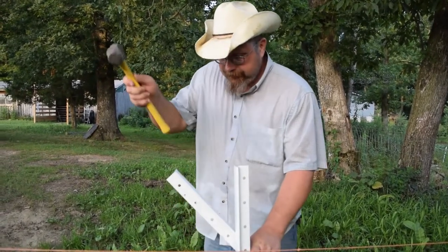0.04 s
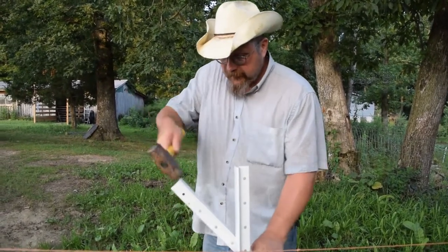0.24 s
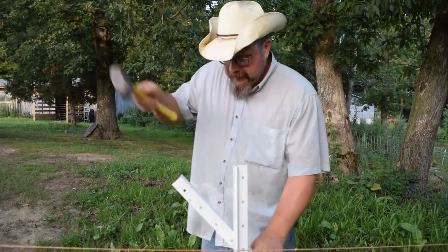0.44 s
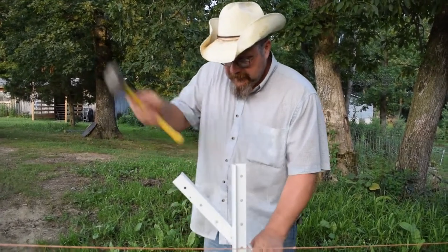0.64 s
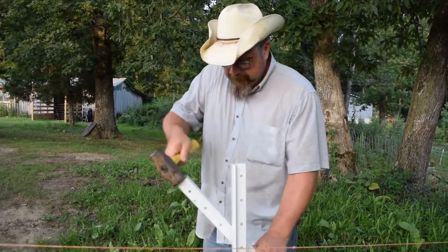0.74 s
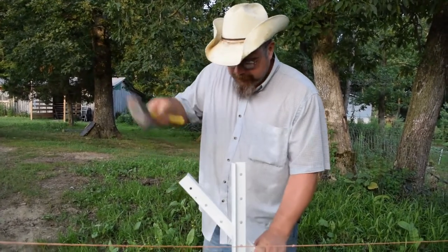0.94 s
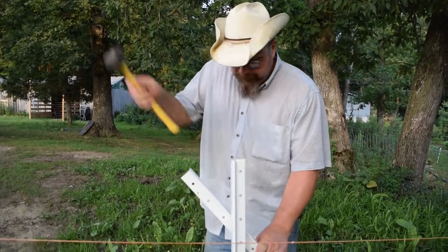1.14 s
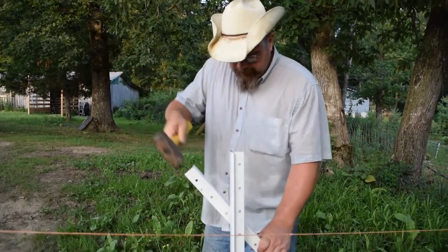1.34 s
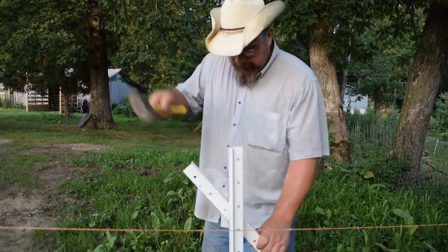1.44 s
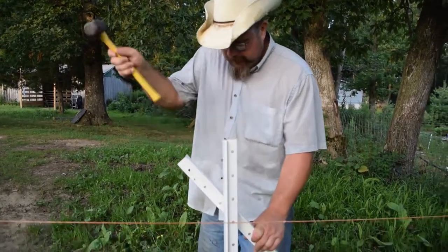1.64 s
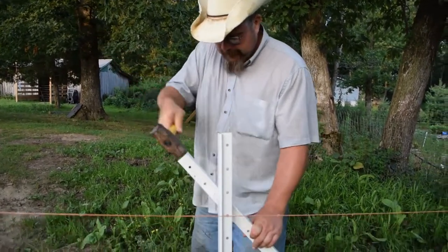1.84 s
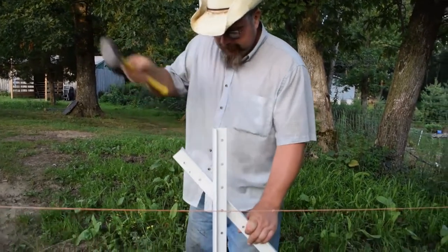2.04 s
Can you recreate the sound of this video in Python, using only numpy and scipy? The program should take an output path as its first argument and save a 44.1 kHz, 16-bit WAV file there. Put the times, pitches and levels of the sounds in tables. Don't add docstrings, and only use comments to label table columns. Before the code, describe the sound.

A heavy hammer whacks a hollow plastic brace against a post four times, each blow a sharp clattering crack with a dull thump and short outdoor echo; close microphone slightly overloaded, faint engines and insects behind.

```python
import sys
import numpy as np
from scipy import signal
from scipy.io import wavfile
from scipy.ndimage import uniform_filter1d

SR = 44100
rng = np.random.default_rng(int(sys.argv[2]) if len(sys.argv) > 2 else 0)


def inscribe(sig):
    pcm = np.round(np.clip(np.atleast_2d(sig).T, -1, 1) * 32767)
    wavfile.write(sys.argv[1], SR, pcm.astype(np.int16))


def field_ratio(decibels):
    return 10 ** (np.asarray(decibels, dtype=float) / 20)


N = 92610


def rms_one(x):
    return x / np.sqrt(np.mean(x ** 2) + 1e-20)


def at_hz(points, hz):
    table_hz, values = np.transpose(points)
    return np.interp(np.log(hz), np.log(table_hz), values)


def drift(rate_hz):
    r = np.exp(-80 * np.pi * rate_hz / SR)
    noise = rng.standard_normal(N // 40 + 2002)
    slow = signal.lfilter([1], [1, -2 * r, r * r], noise)[2000:]
    return np.interp(np.arange(N) / 40, np.arange(len(slow)), rms_one(slow))


def ring(clicks, hz, t60_s):
    r = field_ratio(-60 / (t60_s * SR))
    w = 2 * np.pi * hz / SR
    return signal.lfilter([0, np.sin(w)], [1, -2 * r * np.cos(w), r * r], clicks + 1e-18)


def resonate(x, hz, width_hz):
    r = np.exp(-np.pi * width_hz / SR)
    poles = [1, -2 * r * np.cos(2 * np.pi * hz / SR), r * r]
    return signal.lfilter(np.array([1, 0, -1]) * (1 - r * r) / 2, poles, x)


def bands(low_hz):
    white = rng.standard_normal((2, N))
    edges = low_hz * 2 ** np.arange(0, np.log2(19000 / low_hz), 1 / 3)
    for k, (low, high) in enumerate(zip(edges, edges[1:])):
        band = signal.butter(2, [low, high], "band", fs=SR, output="sos")
        yield np.sqrt(low * high), signal.sosfilt(band, white[k % 2])


def post():
    # (time [s], level [dB], favoured pitch [Hz], chatter length [s])
    contacts = [(0.2007, 10, 2000, 0.0026), (0.2042, 7, 2970, 0.004), (0.2172, -1.5, 1505, 0.004),
                (.2205, -7, 3600, 0.0029), (.2245, -14.5, 1700, 0.0017), (.229, -6.5, 2000, 0.0057),
                (.7367, 12.5, 2360, 0.0021), (0.7414, 5.5, 4580, 0.0031), (.747, 4, 2060, 0.0024),
                (0.7513, -3.5, 1390, 0.0052), (1.2616, 11, 2820, .003), (1.2648, 11.5, 5620, 0.0031),
                (1.2705, -1, 2000, 0.0057), (1.2745, -4.5, 3500, 0.0036), (1.281, -12.5, 2800, 0.0049),
                (1.802, 8.5, 2280, 0.0024), (1.805, 11, 4170, 0.0015), (1.8084, 6, 2700, 0.003),
                (1.813, 6.5, 5340, 0.0024), (1.8178, -5.5, 1700, 0.0021), (1.828, -10, 2720, 0.0043),
                (0.5396, -20.5, 2170, 0.0013), (.5415, -32, 900, 0.0019), (1.9412, -13.5, 2760, 0.00045),
                (1.9448, -13.5, 1760, 0.00097), (2.05, -21, 1670, 0.00065), (2.0544, -24, 1770, 0.00048),
                (1.488, -33, 1000, 0.0022)]
    # (frequency [Hz], level [dB], t60 [s])
    plastic_modes = [(455, -3.5, 0.045), (691, -0.5, 0.014), (900, -5.5, 0.046), (1381, 4, 0.012),
                     (1700, 3.5, 0.0087), (2000, 1.5, 0.011), (2287, 0, 0.015), (2677, 0.5, 0.015),
                     (3176, 2, 0.0074), (3735, -1, 0.0075), (4575, 5, 0.0072), (5577, 1.5, 0.0083),
                     (6480, -3.5, 0.0078), (8560, 5, 0.0026)]
    chatter_per_s, favour_db, favour_octaves = 2000, 13, 0.42
    crack_db, crack_hz, crack_width_hz = -8, 9100, 9000
    soft_below_db, soft_cut_hz = -12, 3600
    t = np.arange(600) / SR
    room_to_ring = 1800
    out = np.zeros(N)
    for s, db, favoured_hz, length_s in contacts:
        draw = rng.random((len(plastic_modes) + 2, len(t)))
        struck = (draw[0] < chatter_per_s / SR) * (t < 3 * length_s)
        clicks = struck * np.exp(-t / length_s)
        clicks[0] = 1
        clicks = np.pad(clicks, (0, room_to_ring))
        signs = np.pad(2 * draw[1:] - 1, ((0, 0), (0, room_to_ring)))
        sound = field_ratio(crack_db) * resonate(clicks * signs[0] * 4, crack_hz, crack_width_hz)
        for sign, (hz, mode_db, t60_s) in zip(signs[1:], plastic_modes):
            octaves_off = np.log2(hz / favoured_hz)
            near_db = favour_db * (np.exp(-0.5 * (octaves_off / favour_octaves) ** 2) - 1)
            kicks = clicks * np.sign(sign) * (0.5 + np.abs(sign))
            sound += field_ratio(mode_db + near_db) * ring(kicks, hz, t60_s)
        if db < soft_below_db:
            soften = signal.butter(3, soft_cut_hz, fs=SR, output="sos")
            sound = signal.sosfilt(soften, sound)
        i = int(s * SR)
        out[i:i + len(sound)] += field_ratio(db - 7) * sound[:N - i]
    return out


def soil():
    # (time [s], level [dB], pitch [Hz], t60 [s])
    thumps = [
        (.206, -6, 250, 0.098),
        (.747, -6.5, 207, 0.089),
        (1.271, -5.5, 217.6, 0.11),
        (1.813, -7, 231, 0.059),
    ]
    push = np.hanning(90) / 45
    out = np.zeros(N)
    for s, db, foot_hz, t60_s in thumps:
        # (lag [s], pitch [Hz], level [dB], t60 [s])
        parts = [(0, foot_hz, 0, t60_s), (0.005, 127.7, -11, t60_s), (0.01, 89.2, -5.5, 0.074)]
        for lag_s, hz, part_db, part_t60_s in parts:
            i = int((s + lag_s) * SR)
            sound = ring(np.pad(push, (0, 9000)), hz, part_t60_s)
            out[i:i + len(sound)] += field_ratio(db + part_db) * sound
    return out


def scatter():
    # (time [s], level [dB], tilt [dB per octave])
    tails = [
        (0.198, -13, -3.5),
        (0.736, -13.5, -1.9),
        (1.26, -12.5, -2.3),
        (1.801, -12.5, -0.3),
    ]
    # (frequency [Hz], density [dB per Hz])
    colour = [(180, -35), (300, -0.5), (348, -11), (674, -12), (1000, -10), (2280, -2.5), (4490, -2.5),
              (10100, -20), (15500, -30)]
    # (frequency [Hz], t60 [s])
    near_t60 = [(300, 0.2), (1000, 0.23), (3000, 0.27), (8000, 0.29), (15000, 0.22)]
    rise_s, far_db, far_stretch = 0.005, -29, 5.5
    patchy_db, banded_db = 2.0, 2.0
    t = np.arange(N) / SR
    out = np.zeros(N)
    for hz, noise in bands(low_hz=250):
        shape = np.zeros(N)
        t60_s = at_hz(near_t60, hz)
        for s, db, tilt in tails:
            age = np.maximum(t - s, 0)
            tail_db = db + tilt * np.log2(hz / 3000) + banded_db * rng.standard_normal()
            swell = 1 - np.exp(-age / rise_s)
            trunks = field_ratio(-60 * age / t60_s)
            sheds = field_ratio(far_db - 60 * age / (t60_s * far_stretch))
            shape += field_ratio(tail_db) * swell * (trunks + sheds)
        out += field_ratio(at_hz(colour, hz) + 9 + patchy_db * drift(23)) * shape * noise
    return out


def wire():
    # (time [s], level [dB], share of the modes above 12 kHz [dB])
    ticks = [(.6754, -56, -8), (.6933, -58, -9), (1.022, -69, -5), (1.1623, -54, -5), (1.18, -54.5, -6),
             (1.225, -66.5, 6), (1.239, -53, -9), (1.717, -50, -3), (1.728, -49, -8), (1.738, -55, -6),
             (1.746, -51, -7)]
    # (frequency [Hz], level [dB], t60 [s])
    wire_modes = [(9000, -5, .006), (10000, 0, .010), (11100, -4, .008), (13200, -8, .006),
                  (14500, 0, .010), (15200, -4, .006)]
    # (time [s], frequency [Hz], level [dB], t60 [s])
    pings = [
        (1.368, 14540, -53, 0.19),
        (1.368, 10100, -46, 0.12),
        (1.369, 11200, -54, 0.078),
        (1.888, 10000, -45, .04),
        (.84, 11000, -52, .04),
        (1.717, 10200, -50, .03),
    ]
    hits = []
    for s, db, high_db in ticks:
        modes = [(hz, mode_db + high_db * (hz > 12000), t60_s) for hz, mode_db, t60_s in wire_modes]
        hits.append((s, db, modes))
    for s, hz, db, t60_s in pings:
        hits.append((s, db, [(hz, 0, t60_s)]))
    out = np.zeros(N + 9200)
    for s, db, modes in hits:
        scratch = rng.standard_normal(200) * np.exp(-np.arange(200) / 70) / 4
        scratch = np.pad(scratch, (0, 9000))
        i = int(s * SR)
        for hz, mode_db, t60_s in modes:
            out[i:i + 9200] += field_ratio(db + mode_db) * ring(scratch, hz, t60_s)
    return out[:N]


def insects():
    # (frequency [Hz], width [Hz], level [dB], throb [per s])
    choruses = [
        (7670, 220, -63, 40),
        (5640, 2000, -56.5, 31),
    ]
    # (start [s], end [s])
    phrases = [
        (.5, 0.52),
        (1.15, 1.25),
        (1.56, 1.5),
        (2.0, 1.3),
    ]
    singer_hz, singer_width_hz, singer_db, rest_db = 6260, 130, -53.5, -16
    throb_db = 1.5
    t = np.arange(N) / SR
    singing = sum(1.0 * (t > start) * (t < end) for start, end in phrases)
    rest = 1 - uniform_filter1d(singing, size=900)
    voices = [(hz, width_hz, db + throb_db * drift(rate)) for hz, width_hz, db, rate in choruses]
    voices.append((singer_hz, singer_width_hz, singer_db + rest_db * rest))
    out = np.zeros(N)
    for hz, width_hz, db in voices:
        once = resonate(rng.standard_normal(N), hz, width_hz)
        out += field_ratio(db) * rms_one(resonate(once, hz, width_hz))
    return out


def engine():
    pitches = [74.9, 91.5]
    # (multiple of the pitch, level [dB])
    engine_orders = [
        [(1, 0), (2, -7), (3, -18)],
        [(1, -0.5), (2, -3), (3, -7.5), (4, -15.5)],
    ]
    # (time [s], lower engine [dB], higher engine [dB])
    swells = [(0, -38.5, -43), (.3, -37, -46), (.6, -43, -43), (.9, -37, -47.5), (1.2, -41, -47),
              (1.5, -45.5, -43), (1.8, -40, -44.5), (2.1, -44, -44.5)]
    wander, flutter_db = 0.012, 2.0
    s, *levels = np.transpose(swells)
    t = np.arange(N) / SR
    out = np.zeros(N)
    for hz, orders, level_db in zip(pitches, engine_orders, levels):
        phase = 2 * np.pi * np.cumsum(hz * (1 + wander * drift(4))) / SR
        tone = np.zeros(N)
        for k, db in orders:
            tone += field_ratio(db + flutter_db * drift(11.5)) * np.sin(k * phase + k * k)
        out += field_ratio(np.interp(t, s, level_db)) * tone
    return out


def whine():
    # (time [s], pitch [Hz], level [dB])
    glide = [
        (.36, 622, -72),
        (.39, 684, -51),
        (.43, 704, -48),
        (.47, 714, -57),
        (.51, 740, -57),
    ]
    s, hz, db = np.transpose(glide)
    t = np.arange(N) / SR
    phase = 2 * np.pi * np.cumsum(np.interp(t, s, hz)) / SR
    return field_ratio(np.interp(t, s, db, -120, -120)) * np.sqrt(2) * np.sin(phase)


def air():
    # (frequency [Hz], density [dB per Hz])
    colour = [(15, -53), (25, -10), (86, -5), (313, -7.5), (945, -8.5), (1050, -11), (1170, -10.5),
              (6380, -32.5), (15500, -52)]
    level_db, patchy_db = -45.5, -2
    together = drift(3.9)
    out = np.zeros(N)
    for hz, noise in bands(low_hz=22.16):
        patches = 0.67 * together + drift(16)
        out += field_ratio(at_hz(colour, hz) + patchy_db * patches) * noise
    return field_ratio(level_db) * rms_one(out)


def scene():
    blows = post() + soil() + scatter()
    yard = wire() + insects() + engine() + whine() + air()
    return (blows + yard)[None]


def band_limit(x):
    return signal.sosfilt(signal.butter(12, 15680, fs=SR, output="sos"), x)


def record(dry):
    mic_low_hz, top_hz = 35, 15700
    clip_top, hardness = 0.96, 12
    low_cut = signal.butter(2, mic_low_hz, "high", fs=SR, output="sos")
    heard = signal.sosfilt(low_cut, dry)
    clipped = heard / (1 + np.abs(heard / clip_top) ** hardness) ** (1 / hardness)
    top_cut = signal.cheby2(8, 30, top_hz * 1.015, fs=SR, output="sos")
    return band_limit(signal.sosfilt(top_cut, clipped))


dry = scene()
out = record(dry)
inscribe(out)
```